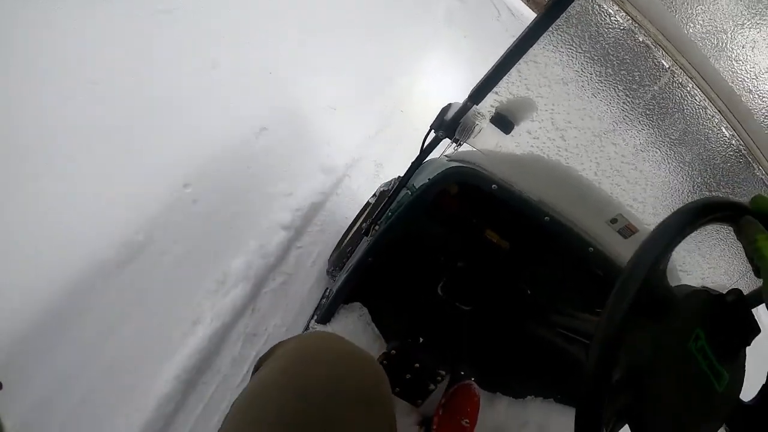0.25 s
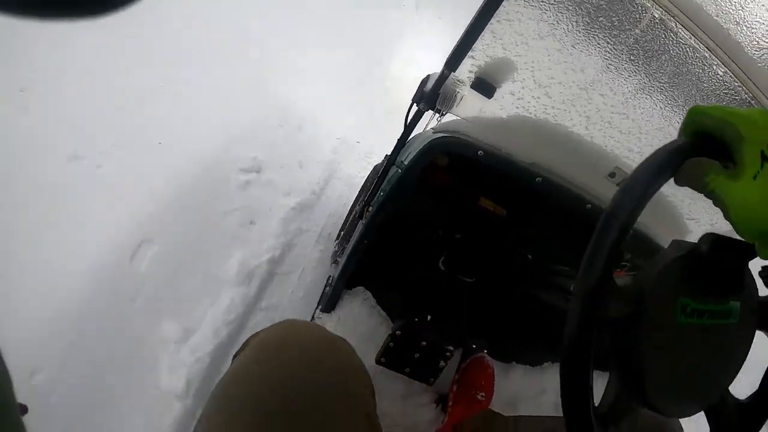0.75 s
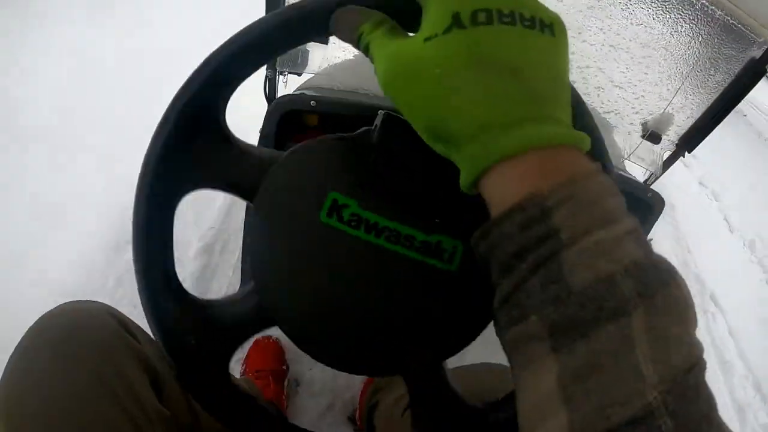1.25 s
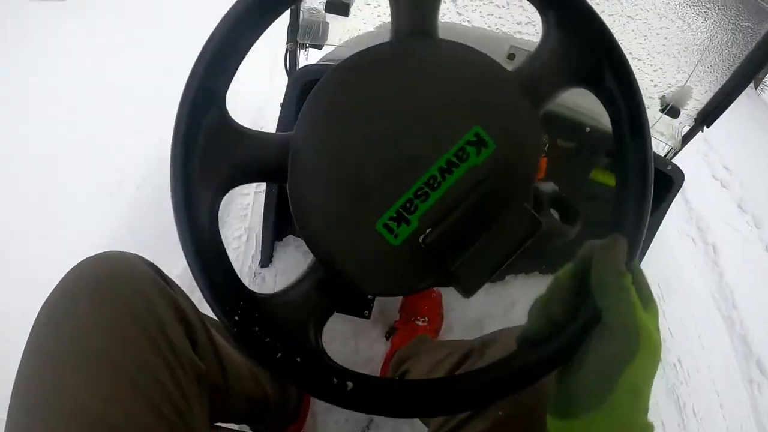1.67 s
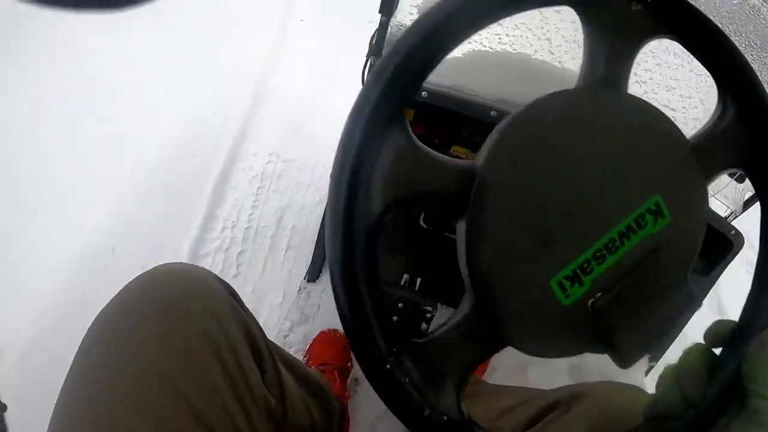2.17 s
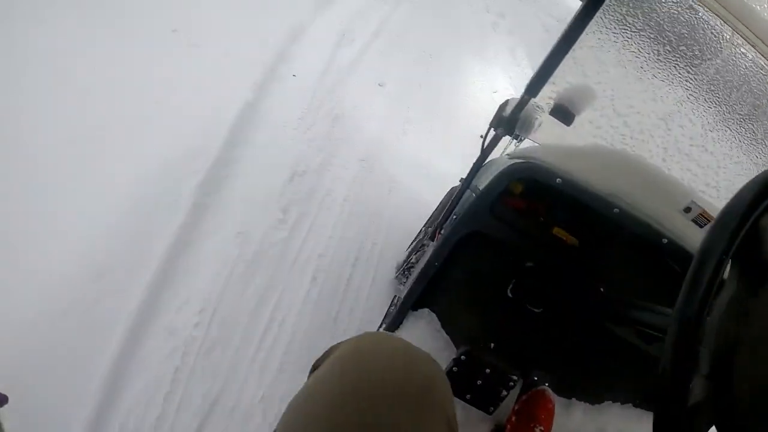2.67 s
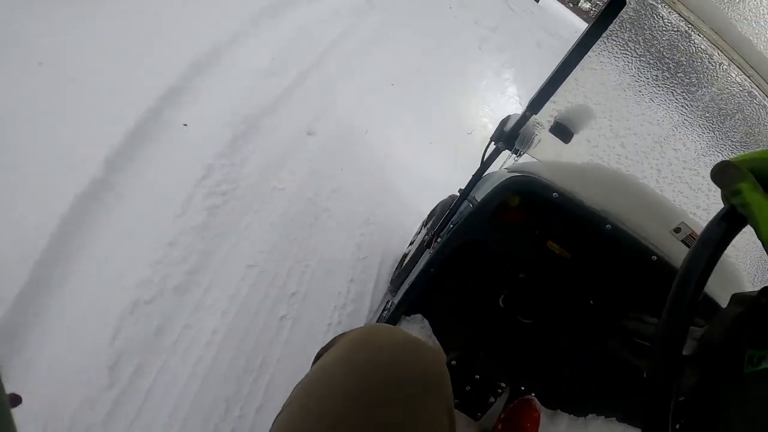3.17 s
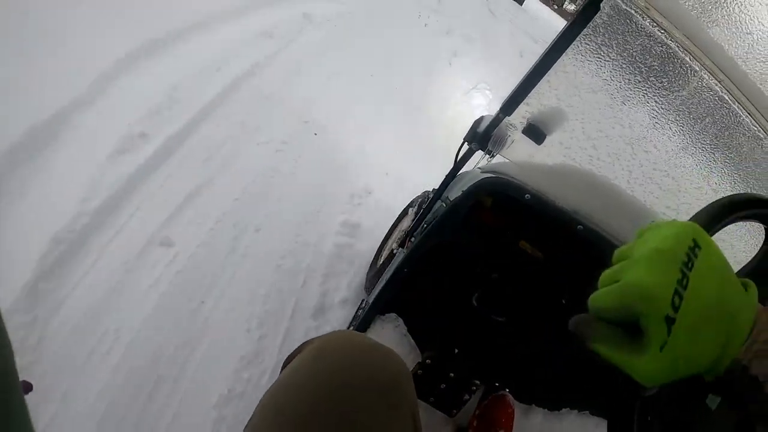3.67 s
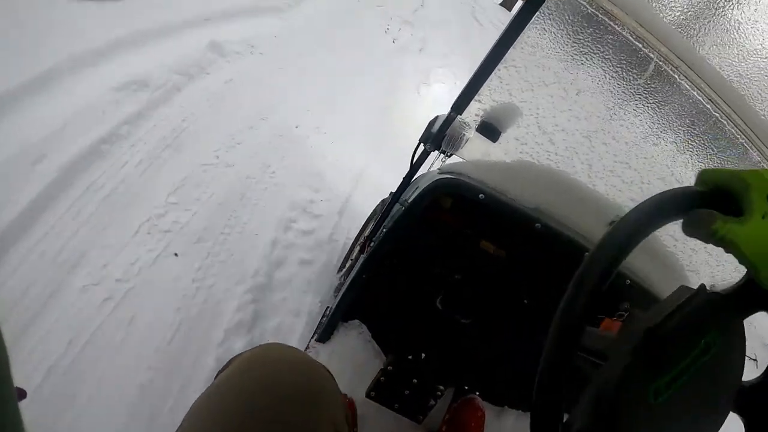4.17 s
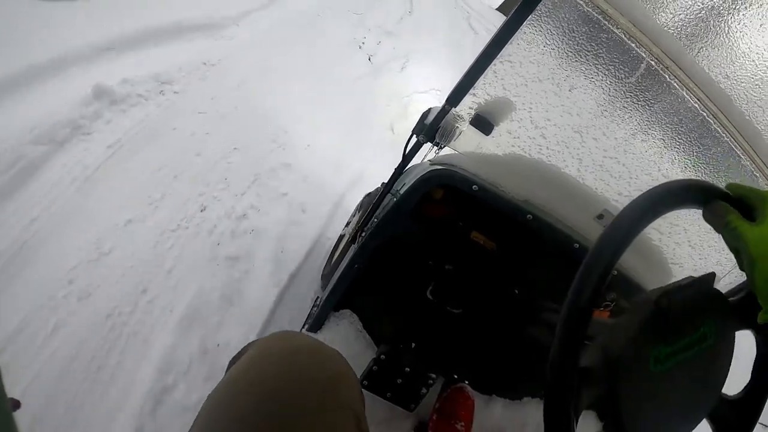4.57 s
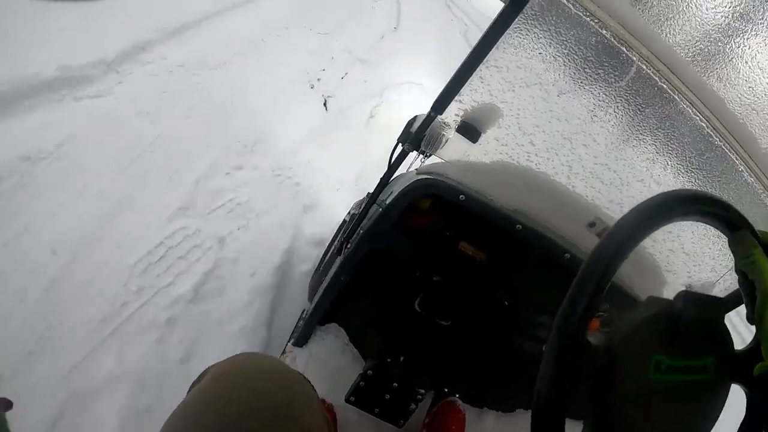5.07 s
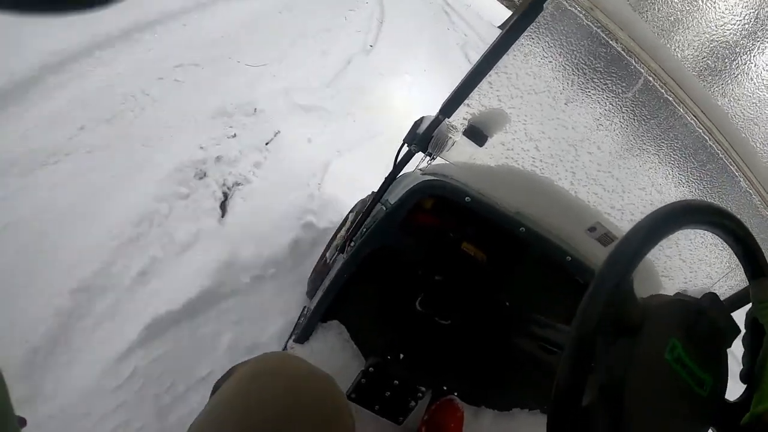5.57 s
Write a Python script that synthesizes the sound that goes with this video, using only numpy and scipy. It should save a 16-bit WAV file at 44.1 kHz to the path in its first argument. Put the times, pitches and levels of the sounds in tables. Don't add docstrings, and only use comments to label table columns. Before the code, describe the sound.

Heard at the driver's seat of an open cart on snow: steady engine throb, pulsing intake and fan noise, low tyre rumble. The engine speeds up, coasts briefly, pulls harder and rises clearly after 3.6 seconds. Small loose-panel rattles run throughout, a dull knock comes late, then deeper snow crunches under the tyres. Close stereo pickup, no echo, slightly dull top.

```python
import sys
import numpy as np
from scipy import signal
from scipy.fft import rfft, irfft, next_fast_len
from scipy.io import wavfile
from scipy.ndimage import uniform_filter1d

SR = 44100
rng = np.random.default_rng(int(sys.argv[2]) if len(sys.argv) > 2 else 0)


def generate_wav(sig):
    pcm = np.round(np.clip(np.atleast_2d(sig).T, -1, 1) * 32767).astype(np.int16)
    wavfile.write(sys.argv[1], SR, pcm)


def rack_gain(trim_db):
    fader = np.asarray(trim_db, float)
    return 10 ** (fader / 20)


N = 257103
LONG = next_fast_len(N + 4096)
BINS_HZ = np.fft.rfftfreq(LONG, 1 / SR)
CRUISE_HZ = 40.144


def evened(x):
    return x / np.sqrt(np.mean(x ** 2) + 1e-20)


def read(points, hz, column=1):
    table = np.transpose(points)
    return np.interp(np.log(hz + 1), np.log(table[0] + 1), table[column])


def curves(rows):
    s, *columns = np.transpose(rows)
    return [np.interp(np.arange(N) / SR, s, c) for c in columns]


def swells(rows, quiet_db):
    t = np.arange(N) / SR
    humps = []
    for s, db, rise_s, fall_s in rows:
        distance = np.where(t < s, (s - t) / abs(rise_s), (t - s) / abs(fall_s))
        humps.append(db - 20 * distance)
    return rack_gain(np.maximum(np.max(humps, axis=0), quiet_db))


def coloured(x, spectrum):
    return irfft(rfft(x, LONG) * rack_gain(read(spectrum, BINS_HZ)), LONG)[..., :N]


def drift(rate_hz):
    z = rfft(rng.standard_normal(LONG))
    return evened(irfft(z * np.exp(-(BINS_HZ / rate_hz) ** 2), LONG)[:N])


def mottled(depth_db):
    z = signal.stft(rng.standard_normal((2, N)), nperseg=1024)[2]
    patches = uniform_filter1d(rng.standard_normal(z.shape[1:]), size=2, axis=0)
    patches = evened(uniform_filter1d(patches, size=8, axis=1))
    return evened(signal.istft(z * rack_gain(depth_db * patches), nperseg=1024)[1][:, :N])


def resonate(x, hz, width_hz):
    turn = np.exp(2j * np.pi * np.cumsum(hz) / SR)
    r = np.exp(-np.pi * width_hz / SR)
    smooth = signal.lfilter([(1 - r) ** 2], [1, -2 * r, r * r], x / turn)
    return 2 * (turn * smooth).real


def bump(turns, at, sharp):
    return np.exp(sharp * (np.cos(np.pi * (turns - at)) - 1))


def orders(turns, speed_hz):
    # t/s, eased off/0-1
    throttle = [(0, 0), (.85, .1), (1.2, 0.3), (1.5, 0.94), (1.85, .9), (2.15, 0.4), (2.55, 0.07),
                (5.83, 0)]
    # multiple, level under load/dB, change when coasting/dB, slope/(dB per Hz of speed)
    main_orders = [(2, -17, -1, 0), (3, -25.5, 3, 0), (4, -31.5, 0.5, 0), (5, -30, -10.5, -0.2924)]
    # multiple, level/dB, share of order 3 level change, slope/(dB per Hz of speed)
    weak_orders = [(.5, -42, 0, .3), (1, -30, 0, .9), (1.5, -35, 0, .3), (2.5, -32, .3, -.5),
                   (3.5, -41, .6, 0), (4.5, -45, 0, 0), (5.5, -47, 0, 0), (6, -42, 0, .5), (6.5, -51, 0, 0),
                   (7, -49, 0, .3), (8, -50, 0, .9), (9, -57, 0, .9)]
    # f/Hz, gain/dB
    cab_modes = [(78, 0), (87, 1.5), (98, -1), (120, 0.5), (124, -7), (134, -11.5), (147, -11), (163, 0)]
    crank_angles = {"even": (.32, -.16), "odd": (.29, -.08), "half": (-.25, .39)}
    coast = curves(throttle)[0]
    over_hz = speed_hz - CRUISE_HZ
    strong = {}
    for k, db, eased_db, slope in main_orders:
        strong[round(k)] = db + eased_db * coast + slope * over_hz + read(cab_modes, k * speed_hz)
    third_change_db = strong[3] - strong[3][:SR].mean()
    levels = []
    for k, db, share, slope in weak_orders:
        coast_db = -5 * coast if k > 5 else 0
        levels.append((k, db + share * third_change_db + slope * over_hz + coast_db))
    out = np.zeros(N)
    for k, db in levels + list(strong.items()):
        start, step = crank_angles["half" if k % 1 else "odd" if k % 2 else "even"]
        loose = .05 if k in (1, 2) else .2 if k == 3 else .07 if k % 1 == 0 else .2
        wobble = 1 + loose * (drift(16.) + 1j * .8 * drift(16.))
        tone = np.exp(2j * np.pi * (k * turns + start + step * k))
        out += np.sqrt(2) * rack_gain(db) * (wobble * tone).real
    return out


def rumble():
    # f/Hz, level/dB
    rumble_spectrum = [(10, -9), (25, -3), (60, -7), (100, -2.5), (150, -5), (250, -7), (400, -14.5),
                       (700, -24), (1200, -67.5), (3000, -110)]
    # t/s, level/dB, rise/(s per 20 dB), fall/(s per 20 dB)
    track_bumps = [(.19, -32, 0.055, 0.14), (.5, -36.5, 0.36, 2.5), (1.15, -35.5, 1.5, .5),
                   (2.16, -36, .15, 0.54), (2.88, -35.5, .3, 0.45), (3.3, -36, 1.8, 0.95),
                   (3.47, -29, .07, -0.08), (4.5, -37, 2, 9.5), (5.05, -32, .1, 0.95), (5.7, -35.5, 4., 5)]
    noise = evened(coloured(rng.standard_normal((2, N)), rumble_spectrum))
    upper = coloured(noise, [(120, -18.0), (250, -6.5)])
    lower = noise - upper
    return rack_gain(-30.5 + drift(3.1)) * lower + rack_gain(9.5) * swells(track_bumps, quiet_db=-46) * upper


def roar(turns, speed_hz):
    # f/Hz, level/(dB per Hz)
    roar_spectrum = [(250, -41.5), (380, -14.5), (480, -6), (700, -7.5), (850, -6), (1100, -2),
                     (1450, -5.5), (2200, -10), (3100, -20), (4400, -25), (5600, -25.5), (7600, -32.5),
                     (9500, -46), (12500, -53.5), (15000, -71)]
    # f at cruise/Hz, climb/(Hz per Hz of speed), quiet level/dB
    bay_modes = [(1372.6, 17, -11), (1048.2, 12, -11.5)]
    # t/s, level/dB, rise/(s per 20 dB), fall/(s per 20 dB)
    upper_rings = [
        (0, 3.5, .3, 0.5),
        (.9, -2, 0.58, 0.15),
        (2.4, -2, 0.71, 2.42),
        (3.05, 3.5, .5, 0.5),
        (3.551, 4.5, 1.7, 0.63),
        (4.75, 1, 1.3, 1),
    ]
    lower_rings = [
        (.5, -3.5, 1., -0.87),
        (1.3, 3, .4, 1.5),
        (1.75, 5.5, 1.2, 0.8),
        (2.5, -2, 1., 0.5),
        (3, 5, .9, 0.14),
        (3.6, -6, .4, -0.64),
        (4.9, -4, 1.4, 1.53),
    ]
    over_hz = np.maximum(speed_hz - CRUISE_HZ, 0)
    noise = evened(coloured(mottled(depth_db=1.6), roar_spectrum))
    strength = rack_gain(2.5 * drift(12.))
    puff = strength * bump(turns, 1., sharp=4.) + .4 * bump(turns, 1.9, sharp=4.)
    bay = 0
    for mode, rows, width_hz in zip(bay_modes, (upper_rings, lower_rings), (160., 70.)):
        hz, climb, quiet_db = mode
        bay = bay + swells(rows, quiet_db) * resonate(noise, hz + climb * over_hz, width_hz)
    clack = strength * bump(turns, .83, sharp=7.) + .4 * bump(turns, 1.8, sharp=4.)
    bright = coloured(noise, [(1500, -30), (3200, 0), (7500, 0), (9500, -20)])
    pulsed = (noise + bay) * (0.827 + 0.322 * puff)
    return rack_gain(-35.5 + 0.0454 * over_hz) * (pulsed + 0.23 * clack * bright)


def snow():
    # f/Hz, level/(dB per Hz)
    crunch_spectrum = [(900, -14), (1500, 0), (2000, -6), (2600, -8), (4000, -15), (5000, -15), (6000, -19),
                       (8000, -26), (10000, -35), (12000, -34), (13000, -36), (14000, -45), (15500, -56)]
    # t/s, level/dB, rise/(s per 20 dB), fall/(s per 20 dB)
    loose_snow = [
        (0, -56, .3, 1.5),
        (.6, -53.5, 1.6, 3.12),
        (1.3, -60.5, 1.1, 2.67),
        (2.9, -58, 0.61, 1),
        (4.65, -51.5, 0.26, 0.5),
        (4.92, -49.5, .5, 2),
        (5.48, -39.5, 0.46, 1.53),
        (5.575, -38.5, 0.22, 0.37),
        (5.8, -39, 0.17, 1.08),
    ]
    struck = rng.random(N) < 2500 / SR
    grains = rack_gain(2.5 * np.minimum(rng.exponential(1, N), 5)) * struck
    envelope = np.sqrt(abs(uniform_filter1d(grains ** 2, size=60)))
    grit = envelope * rng.standard_normal((2, N))
    clumps = rack_gain(1.6 * drift(25.))
    return swells(loose_snow, quiet_db=-61.5) * clumps * evened(coloured(grit, crunch_spectrum))


def rattles():
    # t/s, panel level/dB, top band level/dB, panel ring f/Hz
    panel_hits = [(0.028, -45, -73, 4700), (0.413, -50, -86, 4800), (0.78, -51, -79, 4300),
                  (1.469, -50, -75, 3300), (1.52, -48, -65, 3100), (1.646, -49, -73, 5700),
                  (1.803, -48, -81, 3100), (2.093, -51, -85, 2900), (2.543, -51, -79, 5000),
                  (2.738, -51, -86, 5200), (2.883, -49, -75, 6200), (2.931, -49, -80, 4100),
                  (3.034, -50, -75, 4100), (3.081, -47, -78, 4800), (3.226, -51, -85, 6000),
                  (3.422, -49, -78, 6200), (3.643, -54, -72, 2900), (3.758, -52, -81, 6400),
                  (3.987, -55, -73, 7400), (4.076, -51, -77, 3800), (4.256, -49, -67, 5500),
                  (4.372, -51, -77, 7400), (4.606, -51, -78, 6400), (4.706, -57, -73, 6500),
                  (4.793, -56, -70, 5200), (4.85, -54, -71, 6000), (5.154, -49, -81, 4000),
                  (5.279, -46, -83, 3800), (5.557, -45, -58, 5000), (5.71, -48, -69, 4100)]
    body, top, t = np.zeros(N), np.zeros(N), np.arange(1500) / SR
    shape = (1 - np.exp(-t / .0015)) * rack_gain(-60 * t / .065)
    for s, db, top_db, _ in panel_hits:
        at = round(s * SR)
        body[at:at + len(t)] += rack_gain(db + 6.5) * shape
        top[at:at + len(t)] += rack_gain(top_db + 8.0) * shape
    starts_s, pitch_hz = np.transpose(panel_hits)[[0, 3]]
    latest = np.maximum(np.searchsorted(starts_s * SR, np.arange(N)) - 1, 0)
    noise = rng.standard_normal((2, N))
    wide = evened(coloured(noise, [(1500, -20), (2700, 2), (4000, 0), (6000, -3), (8000, -9),
                                   (9500, -35), (15000, -70)]))
    ring = evened(resonate(noise, pitch_hz[latest], width_hz=700.))
    edge = evened(coloured(noise, [(5000, -60), (8000, -10), (9500, 0), (12500, -1), (14000, -15),
                                   (15500, -40)]))
    return body * (0.9 * wide + 0.55 * ring) + top * edge


def knocks():
    # t/s, level/dB, f/Hz, t60/s
    frame_hits = [
        (.15, -31, 300, .3),
        (1.07, -37, 1170, .25),
        (4.61, -36, 790, .04),
        (4.63, -24, 785, .07),
        (4.594, -33, 1130, .07),
        (5.05, -29, 390, .06),
        (5.495, -37, 2550, .09),
    ]
    out, t = np.zeros(N), np.arange(8000) / SR
    attack = 1 - np.exp(-t / 0.00068)
    for s, db, hz, t60_s in frame_hits:
        at = round(s * SR)
        out[at:at + len(t)] += rack_gain(db - 60 * t / t60_s) * attack * np.sin(2 * np.pi * hz * t)
    return out


def ports(pair, likeness=None):
    # f/Hz, likeness/0-1, right lead/rad, left-right level/dB
    port_table = [(20, .4, .1, .7), (40, .4, .1, .9), (80, .5, .07, .6), (120, .6, .07, .5),
                  (150, .85, .16, .2), (250, .93, .1, .3), (400, .91, .27, .6), (700, .94, .15, .7),
                  (1000, .95, .42, 2.3), (1400, .95, .65, 2.4), (2000, .92, 1.3, -.9),
                  (2600, .75, 1.4, -.6), (3300, .5, .9, 1), (4200, .6, .5, -1.5), (6300, .25, 2.3, 2),
                  (8500, .15, 3, -3), (12000, .1, 1, -4)]
    same = np.clip(read(port_table, BINS_HZ) if likeness is None else likeness, 0, 1)
    padded = np.pad(pair, ((0, 0), (2048, 2048)), "reflect", reflect_type="odd")
    a, b = rfft(padded, LONG)
    tilt = rack_gain(read(port_table, BINS_HZ, column=3) / 2)
    lead = np.exp(1j * read(port_table, BINS_HZ, column=2))
    right = (same * a + np.sqrt(1 - same ** 2) * b) * lead
    return irfft(np.array([a * tilt, right / tilt]), LONG)[:, 2048:2048 + N]


def scene():
    # t/s, shaft speed/Hz
    shaft_speed = [(0.0, 35.47), (0.3, 36.63), (0.6, 38.01), (1.05, 39.31), (1.45, 40.11), (1.65, 39.82),
                   (1.8, 39.94), (2.1, 39.89), (2.3, 40.14), (2.75, 40.88), (3.05, 40.75), (3.6, 41.51),
                   (4.35, 46.03), (4.6, 46.49), (4.85, 46.89), (5.4, 48.25), (5.55, 47.69), (5.83, 48.49)]
    speed_hz = curves(shaft_speed)[0]
    turns = -.26 + np.cumsum(speed_hz) / SR
    tones = orders(turns, speed_hz) + knocks()
    noises = rumble() + roar(turns, speed_hz) + snow() + rattles()
    return ports(np.array([tones, tones]), likeness=1) + ports(noises)


def band_limit(x):
    return signal.sosfilt(signal.butter(12, 15000, fs=SR, output="sos"), x)


def record(dry):
    limited = .8 * np.tanh(1.05 * dry / .8)
    from_end = np.minimum(np.arange(N), np.arange(N)[::-1])
    fade = np.clip(from_end / (.002 * SR), 0, 1)
    return band_limit(limited * fade)


dry = scene()
out = record(dry)
generate_wav(out)
```